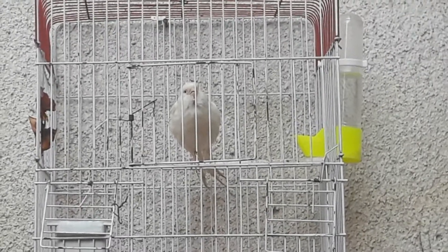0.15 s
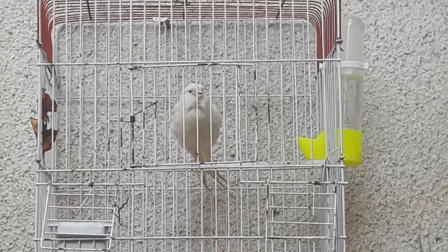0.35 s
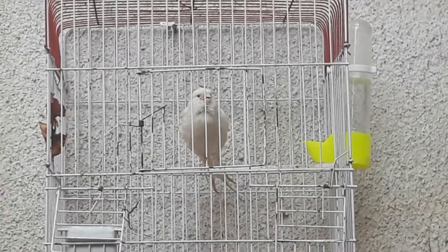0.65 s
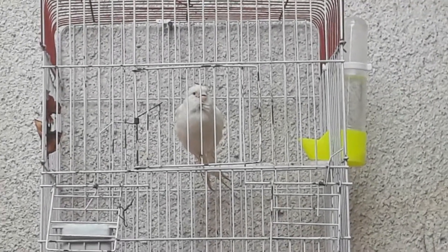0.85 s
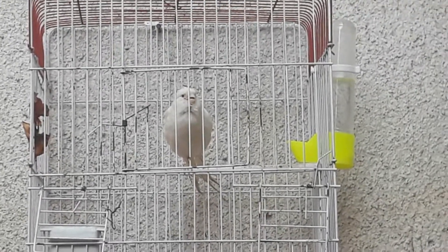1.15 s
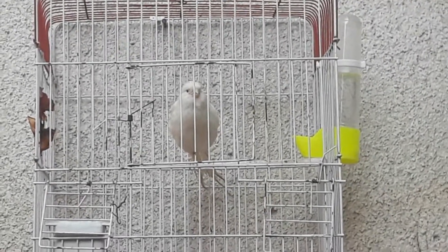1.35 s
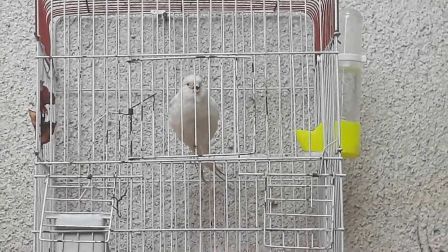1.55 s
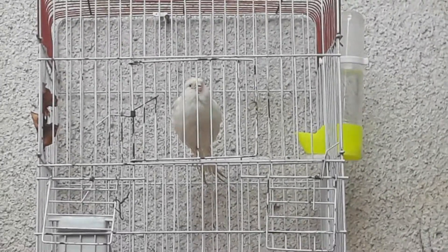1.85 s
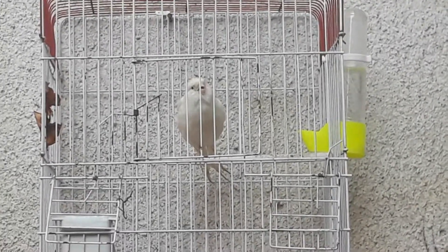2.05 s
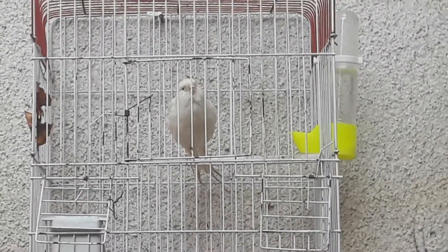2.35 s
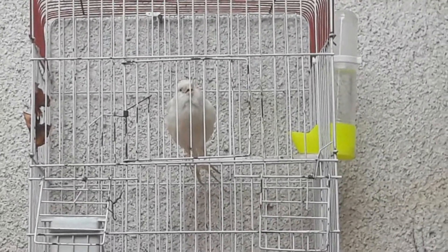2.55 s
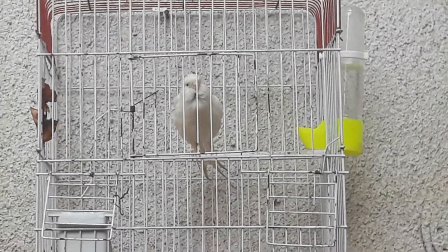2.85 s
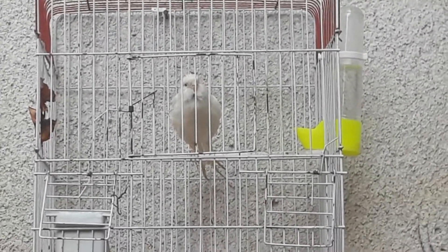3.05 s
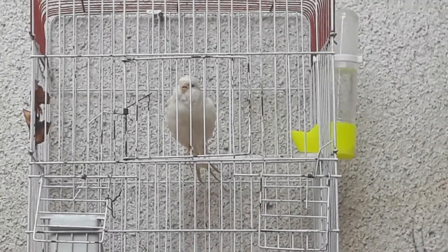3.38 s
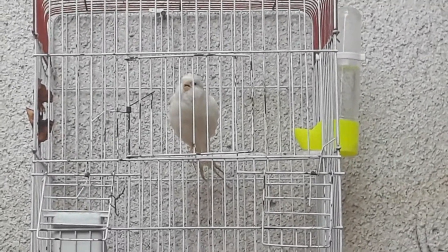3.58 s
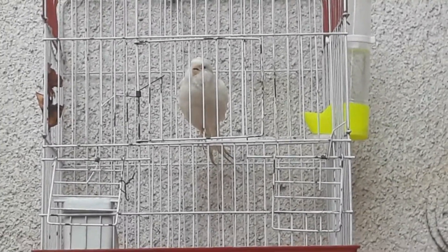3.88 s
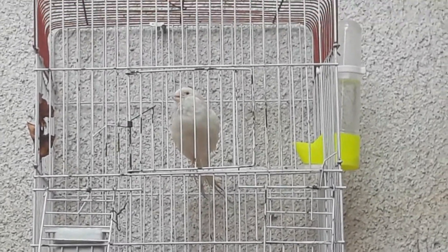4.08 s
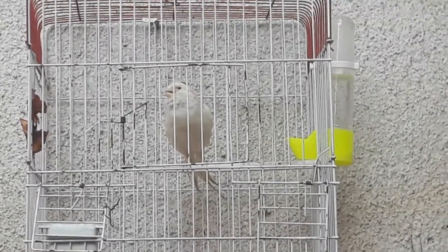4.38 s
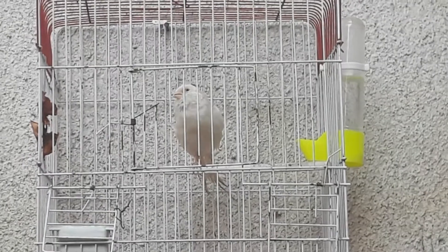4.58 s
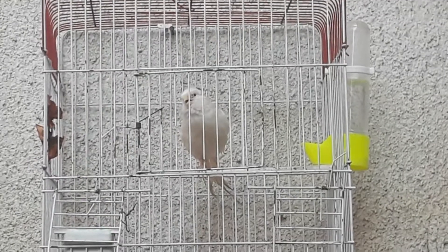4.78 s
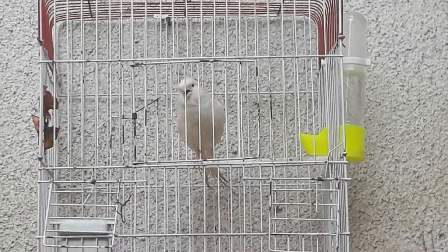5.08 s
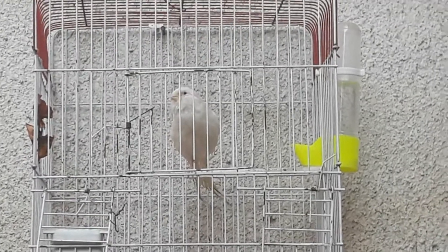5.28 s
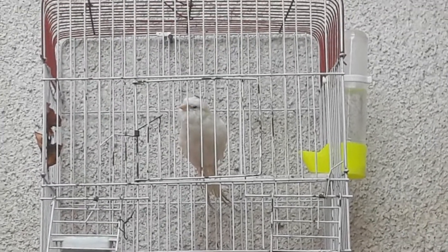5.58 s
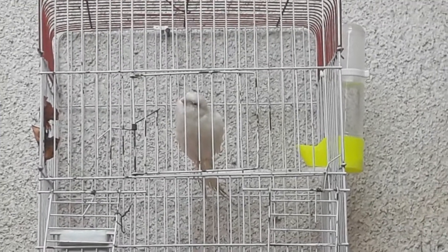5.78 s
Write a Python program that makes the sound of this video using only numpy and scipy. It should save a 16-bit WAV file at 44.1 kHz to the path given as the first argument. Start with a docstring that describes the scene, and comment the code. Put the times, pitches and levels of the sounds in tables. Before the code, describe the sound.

A canary in a wire cage sings almost without pause over steady room noise. It opens with a rattle of ticks and four level whistles, while a faint hoarse rasp pulses behind. Falling chips and rising slurs follow, then a second rattle and a run of quick downward sweeps. Two long notes close the song as the rasp returns. A nearby wall and the room lightly smear the notes.

```python
"""A caged canary by a rough wall, heard over steady room noise; wall and room smear its near-pure notes.
It opens with a rattle of ticks, then four flat whistles, each with a high lead-in, as a hoarse pulsing
rasp starts up, perhaps another bird further off. Falling chips and rising slurs follow, then a second
rattle and a run of down-sweeps. Two long notes close the song while the rasp returns and faint calls
reach the microphone from a distance."""
import sys
import numpy as np
from scipy import signal
from scipy.fft import rfft, irfft, next_fast_len
from scipy.io import wavfile
from scipy.ndimage import map_coordinates

SR = 44100
rng = np.random.default_rng(int(sys.argv[2]) if len(sys.argv) > 2 else 0)


def digitize_waveform(pressure):
    """Quantize a signal to 16-bit integers and store it at the path in sys.argv[1].

    Rows of a 2-D input are taken as channels; values are limited to [-1, 1].
    """
    field = np.atleast_2d(pressure).T
    bounded = np.clip(field, -1, 1)
    quanta = np.round(bounded * 32767).astype(np.int16)
    wavfile.write(sys.argv[1], SR, quanta)


N = 261513

# The steady noise of the place. Each row: frequency in Hz, relative density in dB.
AMBIENT_SPECTRUM = [(20, -33), (35, -14), (50, -11.5), (70, -5), (125, 1), (230, 0.5), (450, -2),
                    (1100, -1.5), (1600, -4.5), (3000, -5.5), (5000, -17), (7500, -25.5), (10000, -39),
                    (15500, -34)]
# Near reflections at the microphone. Each row: delay in seconds, relative level in dB.
WALL_ECHOES = [(.0022, -12), (.0051, -13), (.0072, -12), (.0095, -18), (0.014, -19.5), (.0205, -21),
               (0.034, -15.5)]
# The room's decay. Each row: frequency in Hz, seconds to fall by 60 dB.
ROOM_DECAY = [(500, 0.69), (3000, 0.34), (6000, 0.33), (14000, 0.14)]
# Overtones as they leave beak and cage. Each row: frequency in Hz, relative level in dB.
SECOND_HARMONIC = [(5000, -44.5), (6300, -46), (7300, -30.5), (8000, -39), (8700, -38), (9800, -48.5),
                   (12000, -38.5), (13700, -19.5), (15500, -38.5)]
THIRD_HARMONIC = [(8000, -58), (10200, -48), (11500, -48), (13000, -37), (14800, -23.5), (15800, -36)]
FOURTH_HARMONIC = [(10000, -59.5), (12500, -46.5), (13500, -36.5), (14500, -35.5), (15800, -43.5)]

# Shapes of the quick notes. Each row: share of the length, pitch ratio, level offset in dB.
TICK_SHAPE = [(0, 1.24, -11.5), (.35, 1.09, -11), (0.698, 1.041, 0), (1, 0.75, -3)]
LEAD_IN_SHAPE = [(0, 1.01, -15), (0.299, 1, -4.5), (.55, .96, -4), (.75, .84, -6), (.88, .7, 1.5),
                 (1, 0.53, -8)]
CHIP_SHAPE = [(0, 1.4, -22), (.3, 1.28, -17), (.6, 1.16, -16), (.76, 1.09, -8), (.83, 1.02, -3.5),
              (.93, .94, -8), (1, .86, -7)]
SMOOTH_SWEEP_SHAPE = [(0, 1.27, -30.5), (.16, 1.174, -12), (0.401, 1.1, -7.5), (.56, 1.04, -1),
                      (0.701, .99, -1.5), (0.801, .93, 0), (.9, .82, 2.5), (1, .7, -10)]
STALLED_SWEEP_SHAPE = [(0, 1.26, -27), (.14, 1.18, -16), (.34, 1.07, -6.5), (.48, 1, -1), (.66, .97, -7),
                       (.79, .92, -5), (.88, .85, 2), (1, .72, -8)]

# The ticks of two rattles. Each row: start in seconds, relative level in dB.
RATTLE_TICKS = [(.014, -20), (.0555, -27), (.097, -19), (0.1359, -19.5), (.172, -18.5), (.2105, -19),
                (2.851, -25.5), (2.887, -26.5), (2.9237, -29.5), (2.96, -26.5), (2.994, -23.5),
                (3.0405, -23), (3.077, -21), (3.1155, -21), (3.154, -19.5), (3.1921, -22)]
# Flat whistles. Each row: start and length in seconds, pitch and midway sag in Hz,
# relative levels of the whistle and of its lead-in in dB.
WHISTLE_NOTES = [(0.349, 0.17, 3408, 6, -21, -34), (0.594, 0.21, 3428, 33, -21.5, -30.5),
                 (.872, 0.17, 3415, 41, -18, -33), (1.152, 0.2, 3399, 45.6, -17.6, -28)]
# Two bouts of rasping. Each row: the centres of one bout's pulses in seconds.
RASP_PULSE_TIMES = [
    [0.49, .625, 0.76, .891, 1.00, 1.157, 1.231, 1.374, 1.498, 1.664, 1.852, 2.024, 2.164, 2.271],
    [4.602, 4.77, 4.916, 5.098, 5.254, 5.362, 5.478, 5.585, 5.72, 5.837],
]
# The rasp's slow rise and fall. Each row: time in seconds, relative level in dB.
RASP_SWELL = [(.49, -38), (1.37, -37.5), (1.67, -34), (2.27, -38), (4.6, -53), (4.92, -48.5), (5.1, -44.5),
              (5.36, -43), (5.72, -39.5)]
# The rasp's low and high resonances. Each row: frequency in Hz, relative density in dB.
THROAT_SPECTRUM = [(900, -31.5), (1500, -17), (1950, -4), (2450, 0), (2750, 2), (3100, 2), (3600, 0.5),
                   (4400, -10.5), (6000, -27.5), (9000, -63.5)]
HISS_SPECTRUM = [(2000, -40.5), (3500, -2), (4500, -5), (5200, -1.5), (6100, -1.5), (7350, -4), (8000, -15),
                 (9200, -28), (10300, -36), (12500, -34), (14400, -29.5), (15800, -36)]
# Rising slurs. Each row: start, length and climb time in seconds, pitch at foot, knee and end in Hz,
# relative levels of climb and hold in dB, last pitch step in Hz, seconds left after that step.
SLUR_NOTES = [(1.937, 0.18, .085, 4060, 4968, 5090, -17.3, -25.5, 0, 0),
              (2.179, 0.18, 0.061, 3690, 4667, 4895, -18, -24, 0, 0),
              (2.449, .276, .060, 3790, 4723, 4860, -18, -27, 160, 0.072),
              (4.389, .234, 0.071, 3680, 4790, 4274, -20.5, -24.5, -150, 0.015)]
# Straight glides, often sung under another note by the second side of the syrinx. Each row: start and
# length in seconds, first and last pitch in Hz, first and last relative level in dB, roughness 0-1.
SIDE_GLIDES = [(2.680, .024, 4250, 4300, -34.5, -43, .3), (4.220, 0.049, 5330, 6290, -48, -37, .9),
               (4.240, 0.038, 3100, 3700, -40.5, -26, .8), (4.270, .225, 2950, 3194, -44, -38.5, 0.42),
               (4.285, .087, 3840, 4140, -30, -27.5, 0.2), (4.290, .130, 5020, 5170, -47.5, -53.5, 1),
               (4.300, .128, 6950, 7060, -50.5, -50.5, 0.5), (4.675, .026, 6720, 6560, -49, -42.5, .9),
               (5.110, .069, 5830, 6580, -33, -31.5, .8)]
# Two chirps and a whistle from further off. Each row: as for the glides.
DISTANT_CALLS = [(2.822, 0.021, 2685, 2670, -45, -42, 0.9), (4.555, .55, 2650, 2740, -53, -58.5, .5),
                 (5.760, .040, 1843, 1965, -48, -53.5, 0.97)]
# Down-sweeps. Each row: start and length in seconds, relative level in dB, midway stall 0-1.
SWEEP_NOTES = [(3.303, .042, -21, .7), (3.404, .048, -20, .8), (3.510, .050, -20.5, 1),
               (3.617, .048, -20, .7), (3.723, .044, -20.5, .5), (3.819, .049, -19, 1),
               (3.92, .048, -19, .9), (4.021, .045, -21, 0), (4.122, .045, -19, .1),
               (4.248, 0.04, -22.5, .2)]
# The last long note. Each row: time in seconds, pitch in Hz, relative level in dB.
CLOSING_CONTOUR = [(4.726, 4200, -23.5), (4.744, 4420, -34.5), (4.766, 4369, -18), (4.836, 4279, -28),
                   (4.918, 4355, -20.5), (4.966, 4416, -34.5), (4.978, 4384, -30.5), (5.005, 4440, -46)]


def amp(db):
    """Decibels to gain."""
    return 10 ** (np.asarray(db) / 20)


def along(points, hz):
    """Read (Hz, value) points on a log frequency axis."""
    frequencies, values = np.transpose(points)
    return np.interp(np.log(hz + 1), np.log(frequencies), values)


def wobble(rate, n):
    """A smooth random curve of n samples, with rate knots a second."""
    knots = rng.standard_normal(int(n * rate / SR) + 4)
    return map_coordinates(knots, [np.arange(n) * rate / SR])


def filtered(x, response):
    """Shape x by a gain that depends on frequency."""
    size = next_fast_len(N + SR // 2)
    return irfft(rfft(x, size) * response(np.fft.rfftfreq(size, 1 / SR)), size)[:N]


def noise(spectrum):
    """Coloured noise of rms 1."""
    x = filtered(rng.standard_normal(N), lambda hz: amp(along(spectrum, hz)))
    return x / np.sqrt(np.mean(x ** 2) + 1e-20)


def add(track, start, x):
    """Mix x into the track from start, in seconds."""
    i = max(0, round(start * SR))
    track[i:i + len(x)] += x[:max(0, N - i)]


def ambience(level_db=-47.5, drift_db=0.9):
    """The steady noise around the microphone, drifting slightly in level."""
    return amp(level_db + drift_db * wobble(2.243, N)) * noise(AMBIENT_SPECTRUM)


def syrinx(contour, waver, rough, overtone_db, fade_s=0.00096):
    """One near-pure tone along (seconds, Hz, dB) points; roughness makes pitch and level flutter."""
    times, pitch, level = np.transpose(contour)
    t = np.arange(times[0], max(times[-1], times[0] + fade_s), 1 / SR)
    unsteady = 1 + waver * wobble(140, len(t)) + .03 * rough * wobble(800, len(t))
    hz = np.interp(t, times, pitch) * unsteady
    phase = 2 * np.pi * np.cumsum(hz) / SR
    overtones = sum(amp(along(colour, k * hz)) * np.sin(k * phase) * (k * hz < SR / 2)
                    for k, colour in enumerate([SECOND_HARMONIC, THIRD_HARMONIC, FOURTH_HARMONIC], 2))
    from_edge = np.minimum(t - t[0], t[-1] - t)
    gate = np.sin(np.pi / 2 * np.clip(from_edge / fade_s, 0, 1)) ** 2
    flutter_db = 5 * np.tanh(rough * wobble(500, len(t)))
    strength = amp(np.interp(t, times, level) + flutter_db)
    return np.sqrt(2) * strength * gate * (np.sin(phase) + amp(overtone_db) * overtones)


def phrase(contours, waver, rough, overtone_db):
    """Notes sung one after another."""
    track = np.zeros(N)
    for contour in contours:
        add(track, contour[0][0], syrinx(contour, waver, rough, overtone_db))
    return track


def trill(syllables, shape, waver, rough, overtone_db):
    """One note shape repeated, each time at its own length, pitch and strength."""
    contours = [np.array(shape) * [length, hz, 1] + [start, 0, db]
                for start, length, hz, db in syllables]
    return phrase(contours, waver, rough, overtone_db)


def ticks(length_s=.006, centre_hz=3163, hz_per_db=42):
    """Very short downward flicks; a harder tick is also higher."""
    mean_db = np.mean([db for _, db in RATTLE_TICKS])
    syllables = [(start, length_s, centre_hz + hz_per_db * (db - mean_db), db)
                 for start, db in RATTLE_TICKS]
    return trill(syllables, TICK_SHAPE, waver=.015, rough=.3, overtone_db=4.5)


def room(x, walls_db, tail_db, build_s=0.0017):
    """From bird to microphone: direct sound, near reflections and a tail whose treble dies first."""
    hz, t, spectra = signal.stft(rng.standard_normal(SR * 3 // 4), SR, nperseg=256)
    decay = amp(-60 * t / along(ROOM_DECAY, hz)[:, None])
    build_up = 1 - np.exp(-t / build_s)
    tail = signal.istft(spectra * decay * build_up, SR, nperseg=256)[1]
    response = amp(tail_db) * tail / np.linalg.norm(tail)
    response[0] += 1  # direct sound
    for delay, db in WALL_ECHOES:
        response[round(delay * SR)] += amp(db + walls_db)
    return signal.fftconvolve(x, response)[:N]


def lead_ins(ahead_s=.045, length_s=.031, pitch_hz=6860):
    """A thin falling note just ahead of each whistle."""
    syllables = [(start - ahead_s, length_s, pitch_hz, db) for start, *_, db in WHISTLE_NOTES]
    return trill(syllables, LEAD_IN_SHAPE, waver=0.008, rough=0.44, overtone_db=3.5)


def held_contour(start, t, hz, db, scoop_share=.15, scoop_s=.005, release_s=.015, release_db=11.5):
    """The (seconds, Hz, dB) points of a held note: it scoops up to pitch and ends in a quick fade."""
    scoop = 1 - scoop_share * np.exp(-t / scoop_s)
    fade_db = release_db * np.clip(1 - (t[-1] - t) / release_s, 0, 1)
    return np.column_stack([start + t, hz * scoop, db - fade_db])


def whistles(arch_db=7.5, shimmer_db=1.9, catch_at_s=.69, catch_s=.0083, catch_db=9):
    """Each whistle swells and fades in an arch, and its pitch sags where it is strongest."""
    contours = []
    for start, length, hz, sag_hz, db, _ in WHISTLE_NOTES:
        t = np.arange(0, length, 1 / SR)
        slack = (2 * t / length - 1) ** 2  # 1 at the ends, 0 midway
        # One whistle catches: a brief swell between two dips.
        from_catch = (start + t - catch_at_s) / catch_s
        catch = (1 - from_catch ** 2) * np.exp(-from_catch ** 2 / 2)
        level = db - arch_db * slack + catch_db * catch + shimmer_db * wobble(51, len(t))
        contours.append(held_contour(start, t, hz - sag_hz * (1 - slack) ** 2, level))
    return phrase(contours, waver=0.0013, rough=0.014, overtone_db=-2.5)


def rasp_power(duty=0.52):
    """Rounded pulses that fill a set share of their spacing and follow one slow swell."""
    t = np.arange(N) / SR
    pulses = sum(np.exp(-np.abs(2 * (t - centre) / (duty * gap)) ** 3)
                 for bout in RASP_PULSE_TIMES for centre, gap in zip(bout, np.gradient(bout)))
    swell_db = np.interp(t, *np.transpose(RASP_SWELL))
    return pulses * amp(swell_db) ** 2


def lingering(power, decay_s, tail_db):
    """Strength of a pulsing sound together with its decay in the room."""
    keep = np.exp(-1 / (decay_s * SR))
    tail = signal.lfilter([1 - keep], [1, -keep], power)
    return np.sqrt(power + amp(tail_db) ** 2 * tail)


def rasp(throat_db=-6, hiss_db=-2, dulling=0.67, grain_db=0.7):
    """Hoarse pulses of noise in a low and a high resonance; weak pulses are duller."""
    power = rasp_power()
    low = lingering(power, decay_s=0.015, tail_db=-7.5)
    low = low.max() * (low / low.max()) ** dulling  # the throat weakens less than the hiss
    throat = amp(throat_db) * low * noise(THROAT_SPECTRUM)
    hiss = amp(hiss_db) * lingering(power, decay_s=0.038, tail_db=-2) * noise(HISS_SPECTRUM)
    return (throat + hiss) * amp(grain_db * wobble(250, N))


def chips(start_s=1.43, period_s=.0812, length_s=.039, pitch_hz=4980, count=6):
    """Gritty falling notes that come at an even pace and grow louder."""
    levels_db = np.linspace(-20, -17.5, count)
    syllables = [(start_s + k * period_s, length_s, pitch_hz, db) for k, db in enumerate(levels_db)]
    return trill(syllables, CHIP_SHAPE, waver=0.018, rough=.85, overtone_db=3)


def slurs(attack_s=.015, attack_db=11, knee_dip_db=4, settle_s=.06, step_s=.006):
    """A loud, uneven climb to a knee, then a softer hold that settles in pitch and may end on a step."""
    contours = []
    for start, length, climb, foot_hz, knee_hz, end_hz, climb_db, hold_db, step_hz, after in SLUR_NOTES:
        t = np.arange(0, length, 1 / SR)
        rise = np.minimum(t / climb, 1)
        settled = 1 - np.exp(-np.maximum(t - climb, 0) / settle_s)
        uneven = 1 + .012 * np.sin(np.pi * rise) * wobble(90, len(t))
        hz = (foot_hz + (knee_hz - foot_hz) * rise + (end_hz - knee_hz) * settled) * uneven
        hz += step_hz * (1 + np.tanh((t - length + after) / step_s)) / 2
        level = np.interp(t, [0, attack_s, attack_s + climb, climb + settle_s],
                          [climb_db - attack_db, climb_db, hold_db - knee_dip_db, hold_db])
        contours.append(held_contour(start, t, hz, level))
    return phrase(contours, waver=0.0026, rough=.036, overtone_db=-0.5)


def back_wall(x, delay_s=.00218, echo_db=-9.5):
    """The wall close behind the cage: a glide swells and dips, in and out of step with its echo."""
    track = x.copy()
    add(track, delay_s, amp(echo_db) * x)
    return track


def glides(rows, waver, overtone_db):
    """Notes that move in a straight line of pitch and level; the hoarser ones also waver more."""
    track = np.zeros(N)
    for start, length, first_hz, last_hz, first_db, last_db, rough in rows:
        contour = [(start, first_hz, first_db), (start + length, last_hz, last_db)]
        add(track, start, syrinx(contour, waver * rough, rough, overtone_db, fade_s=.004))
    return track


def distant_calls(gain_db=-4):
    """Small blurred calls far from the microphone, more room than direct sound."""
    calls = glides(DISTANT_CALLS, waver=0.044, overtone_db=-6)
    return amp(gain_db) * room(calls, walls_db=-5, tail_db=5.5)


def sweeps(midway_hz=4179, scatter=.012):
    """Falling notes, each between a smooth glide and one that rests midway before it snaps down."""
    track = np.zeros(N)
    for start, length, db, stall in SWEEP_NOTES:
        shape = (1 - stall) * np.array(SMOOTH_SWEEP_SHAPE) + stall * np.array(STALLED_SWEEP_SHAPE)
        hz = midway_hz * (1 + scatter * rng.standard_normal())
        track += trill([(start, length, hz, db)], shape, waver=.013, rough=.45, overtone_db=2)
    return track


def closing_note(gain_db=-2.5):
    """After the last slur, one long clear note that swells and dips around a nearly level pitch."""
    return amp(gain_db) * phrase([CLOSING_CONTOUR], waver=0.0017, rough=.03, overtone_db=-2.5)


def scene():
    """The canary in its room at one microphone, with distant calls, the rasp and the ambience."""
    # Quick notes cross a wide range of pitch in an instant; the room smears each into a short hiss.
    song = room(ticks(), walls_db=-1, tail_db=-2.5)
    song += room(sweeps(), walls_db=-2, tail_db=-5)
    high_notes = lead_ins() + chips() + glides(SIDE_GLIDES, waver=0.0091, overtone_db=4)
    song += room(high_notes, walls_db=-2.5, tail_db=-3.5)
    # Held notes beat against their own reflections.
    song += room(whistles(), walls_db=-21.5, tail_db=-10.5)
    song += room(back_wall(slurs()) + closing_note(), walls_db=-3.5, tail_db=-4.5)
    return (song + distant_calls() + rasp() + ambience())[None]


def record(dry):
    """The microphone chain passes nothing above its band limit."""
    top_hz = 15850
    return np.array([filtered(channel, lambda hz: hz < top_hz) for channel in dry])


dry = scene()
out = record(dry)
digitize_waveform(out)
```